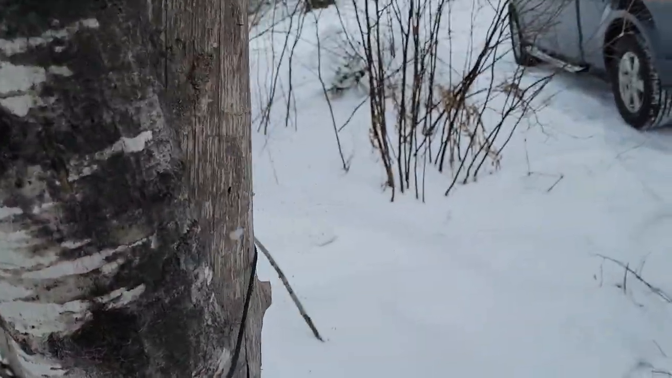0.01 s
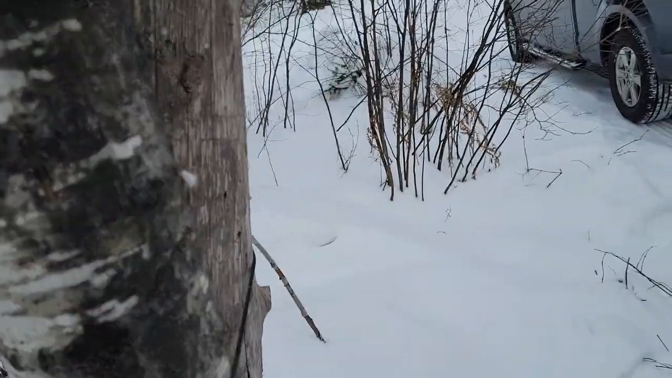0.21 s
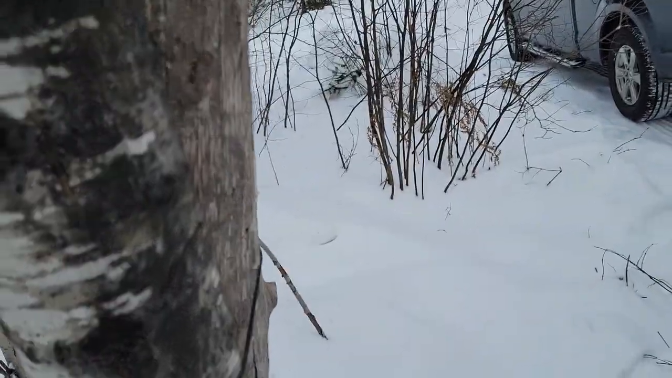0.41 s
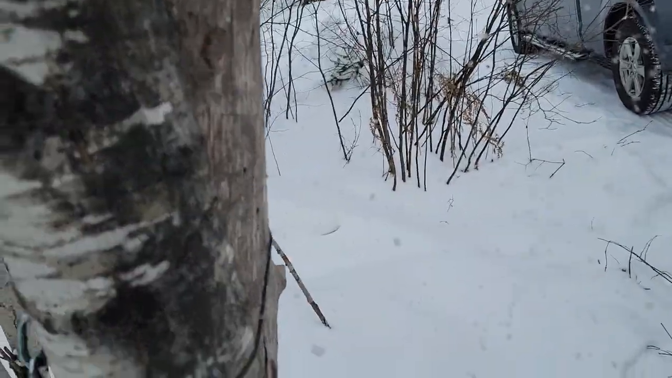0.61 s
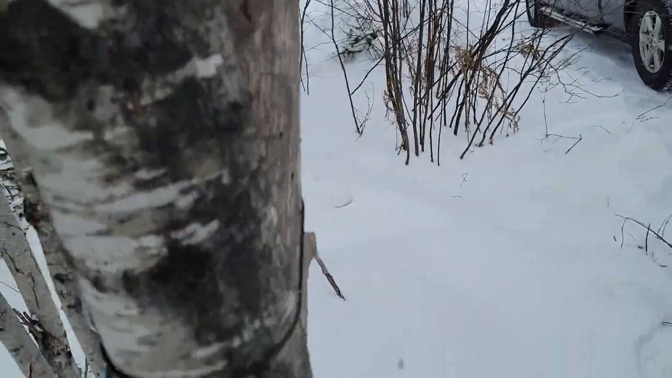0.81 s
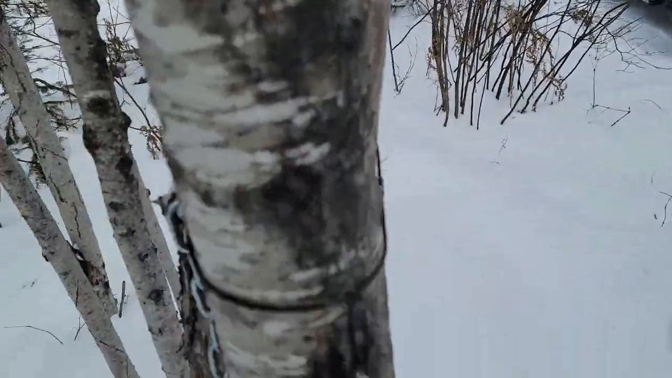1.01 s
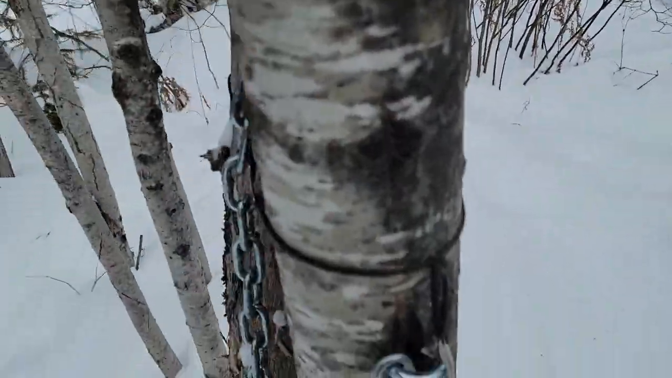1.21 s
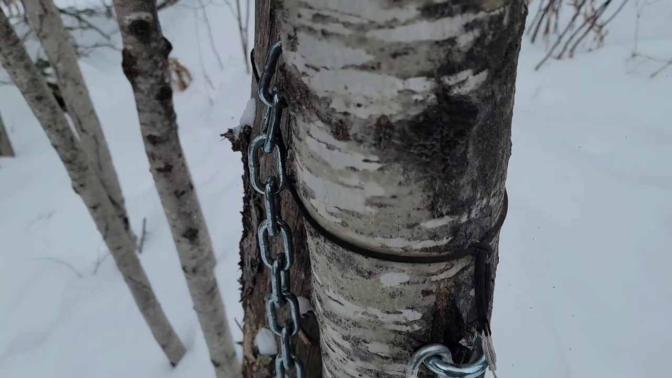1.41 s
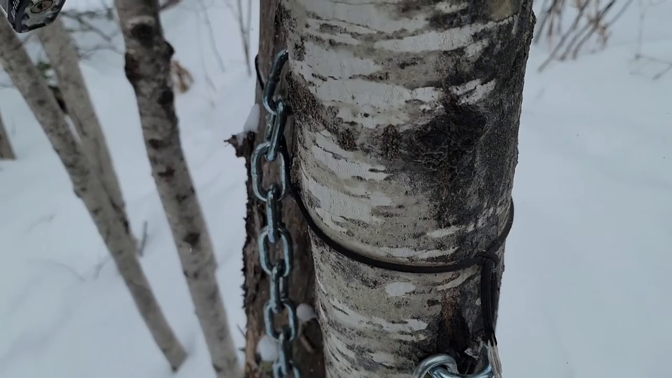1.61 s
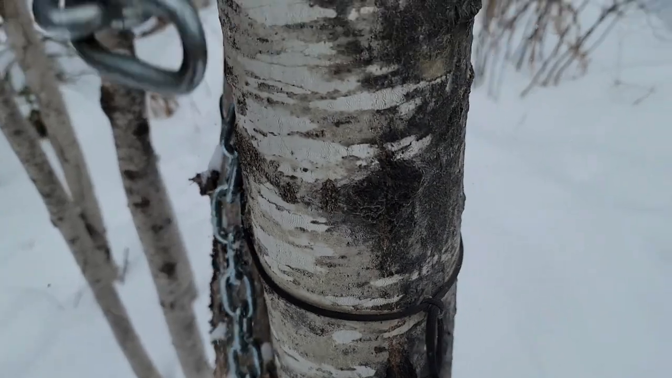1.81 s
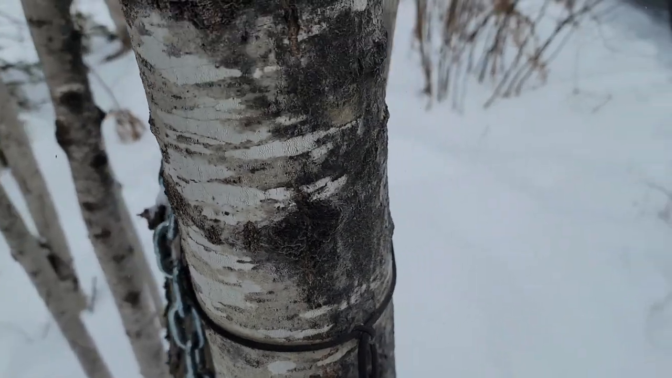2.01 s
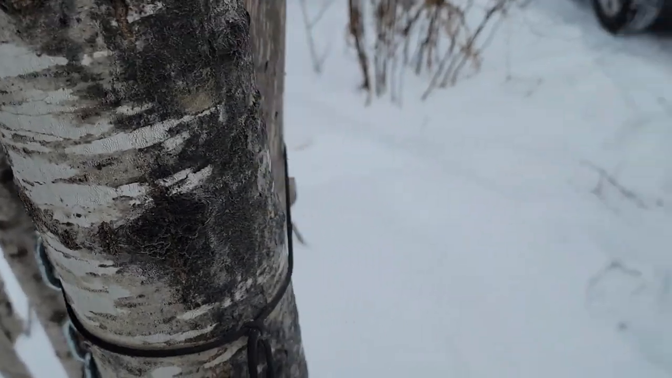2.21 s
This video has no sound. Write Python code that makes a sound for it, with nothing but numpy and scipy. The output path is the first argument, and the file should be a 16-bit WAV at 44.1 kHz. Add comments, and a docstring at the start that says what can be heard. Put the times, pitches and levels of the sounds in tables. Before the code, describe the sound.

Thin, very high chain jingling beside a tree outdoors, with crunching snow steps and light finger knocks

```python
"""Outdoors in winter beside a tree post: a steel chain is handled close to the microphone.
Its short links strike in flurries of uneven contacts, each exciting a very high ring and a tick of noise.
Boots press into crusted snow: filtered grains pack and crunch, short bursts crack or knock dully, narrow
noise squeaks and low, brief waves thud. Clothing rustles and air rumbles on the microphone as shaped
noise; a finger taps beside its left side as short knocks."""
import sys
import numpy as np
from scipy import signal
from scipy.fft import rfft, irfft, next_fast_len
from scipy.io import wavfile
from scipy.ndimage import uniform_filter1d, minimum_filter1d

SR = 44100
rng = np.random.default_rng(int(sys.argv[2]) if len(sys.argv) > 2 else 0)


def inscribe(sig):
    """Save sig as 16-bit PCM at rate SR to the path in sys.argv[1].

    A 1-D sig is mono; a 2-D sig holds one channel per row.
    Samples are clipped to [-1, 1] before scaling.
    """
    pcm = np.round(np.clip(np.atleast_2d(sig).T, -1, 1) * 32767)
    wavfile.write(sys.argv[1], SR, pcm.astype(np.int16))


N = 99225  # samples, 2.25 s


def undb(db):
    """Decibels to amplitude gain."""
    return 10 ** (np.asarray(db) / 20)


def unit(x):
    """Scale to rms 1 over all channels together."""
    return x / np.sqrt(np.mean(x ** 2) + 1e-20)


def sides(db):
    """Left and right gains for a left-minus-right level difference, at constant power."""
    half_difference_db = np.array([[db], [-db]]) / 2
    return unit(undb(half_difference_db))


def curve(points):
    """Join (time_s, level_db) points into a gain for every sample."""
    time_s, level_db = np.array(points).T
    return undb(np.interp(np.arange(N) / SR, time_s, level_db))


def colour(x, points):
    """Minimum-phase filter, built by folding the cepstrum, with the response of (frequency_hz, level_db)."""
    size = 2 * next_fast_len(x.shape[-1])
    hz, db = np.array(points).T
    bin_hz = np.arange(size // 2 + 1) * SR / size
    response_db = np.interp(np.log(bin_hz + 1), np.log(hz), db)
    cepstrum = irfft(np.log(undb(response_db)))
    # Folding the second half onto the first makes the filter causal
    cepstrum[1:size // 2] *= 2
    cepstrum[size // 2 + 1:] = 0
    filtered = irfft(rfft(x, size) * np.exp(rfft(cepstrum)))
    return filtered[..., :x.shape[-1]]


def fade(t, t60):
    """Exponential decay, 60 dB in t60 seconds."""
    return np.exp(-np.log(1000) * t / max(t60, 1e-4))


def add(out, x, start):
    """Mix a sound in at its start in seconds."""
    i = int(np.clip(start * SR, 0, N - 1))
    out[:, i:i + x.shape[-1]] += x[:, :N - i]


def pair(three, lag_ms, diffuse):
    """One shared signal that reaches the right side late, plus a separate one on each side."""
    late = np.roll(three[0], int(round(lag_ms * SR / 1000)))
    shared = unit(np.array([three[0], late]))
    separate = unit(three[1:])
    return np.sqrt(1 - diffuse) * shared + np.sqrt(diffuse) * separate


def noise(channels=3):
    """Unrelated white noises."""
    return rng.standard_normal((channels, N))


def rustle():
    """Clothing rubs close by: coloured noise, nearly all shared by both sides, follows a level curve."""
    # Level of the rustle: time_s, level_db
    rustle_level = [(0, -37.5), (.08, -39.5), (.25, -60), (.62, -33.5), (.78, -30.5), (1.03, -37.5),
                    (1.4, -30), (1.7, -40.5), (1.95, -47.5), (2.12, -58)]
    # Spectrum of the cloth: frequency_hz, level_db
    cloth_spectrum = [(80, -13), (160, -0.5), (330, 2), (650, -1.5), (1000, -5), (2000, -13.5),
                      (4000, -22.5), (7000, -27.5), (12000, -38.5)]
    return pair(colour(noise(), cloth_spectrum), lag_ms=0.28, diffuse=0.074) * curve(rustle_level)


def rumble():
    """Air moves on the microphone: low noise, partly separate on each side, follows a level curve."""
    # Level of the rumble: time_s, level_db
    rumble_level = [(0, -37.5), (.7, -42), (1.03, -50.5), (1.16, -37.5), (1.48, -39.5), (1.62, -50.5),
                    (2.25, -52)]
    # Spectrum of the air: frequency_hz, level_db
    air_spectrum = [(15, -13), (35, -2), (55, 6), (80, 5), (115, -2), (170, -15.5), (500, -59.5)]
    return pair(colour(noise(), air_spectrum), lag_ms=0, diffuse=0.45) * curve(rumble_level)


def chain():
    """In a flurry near-alike links each tick and ring on their own run of uneven contacts, which thins out."""
    # Link flurries: start_s, level_db, length_s, lead_pitch_hz, ring_t60_s, left_right_db
    flurries = [(0.025, -49.5, 0.24, 13300, 0.087, 3), (0.172, -27.5, 0.0041, 12750, 0.18, 8),
                (0.201, -12.5, 0.007, 13350, 0.17, 8), (0.291, -27, 0.1, 13700, 0.36, 6),
                (0.428, -22.5, 0.0038, 13950, 0.059, 9), (0.518, -38, .004, 12780, 0.085, 5),
                (0.572, -19.5, .012, 12780, 0.12, 4), (0.651, -22.5, 0.021, 13500, 0.15, 7),
                (0.682, -14, 0.0054, 13600, 0.19, 8), (0.702, -13.5, 0.02, 12730, 0.13, 6),
                (0.74, -15.5, 0.022, 13780, 0.088, 6), (0.819, -16, 0.045, 12800, 0.12, 5.5),
                (0.902, -31, 0.092, 13250, 0.27, 0), (1.019, -22, 0.013, 13300, 0.11, 13),
                (1.035, -9, 0.019, 12730, 0.3, 2.5), (1.063, -4.5, 0.0096, 13800, 0.082, -6),
                (1.103, -13.5, 0.028, 13560, 0.16, 5), (1.2, -41.5, 0.21, 12750, 0.15, 3),
                (1.4, -28, 0.02, 13900, 0.064, 8), (1.457, -25, 0.027, 12750, 0.12, 6),
                (1.492, -20, 0.013, 13800, 0.084, 5), (1.509, -11.5, 0.036, 12780, 0.25, 1),
                (1.583, -29, 0.0166, 13800, 0.092, 0), (1.632, -19.5, 0.022, 12750, 0.052, 1),
                (1.689, -21.5, 0.012, 13250, 0.066, 3), (1.713, -18, 0.0079, 12780, 0.11, 4),
                (1.764, -26.5, 0.018, 12750, 0.29, 3), (1.785, -16, 0.0017, 13780, 0.13, -3),
                (1.797, -16.5, 0.021, 13280, 0.096, 5), (1.845, -15, 0.023, 12730, 0.16, 6.5),
                (1.908, -13, 0.035, 13780, 0.2, 5), (1.937, -7.5, 0.022, 12700, 0.13, -4.5),
                (1.967, -12.5, .017, 13760, .1, 4), (2.206, -36, 0.11, 13750, 0.07, 8)]
    # Ringing of the neighbouring links: frequency_hz, level_db
    link_modes = [(12660, -3.5), (12740, -1), (12810, -11), (13110, -18), (13220, 4), (13300, -2),
                  (13450, -1.5), (13570, -13.5), (13760, 2), (14400, -11)]
    # Spectrum of the tick at each contact: frequency_hz, level_db
    tick_spectrum = [(2500, -28.5), (6800, -15.5), (9000, -20), (11500, -9.5), (13300, 6.5), (15300, -10.5),
                     (17000, -21.5)]
    links_touched, contacts_per_s = 3, 1300  # the initial contact rate is shared among the links
    first_contact = 1.6  # strength of the contact that opens a flurry
    contact_scatter_db, contact_s = 5, 0.00035  # a link's ring builds up over the time of contact
    mode_spread, lead_db = 0.005, 7.5  # spread of link pitches as a fraction; level of the leading mode
    tick_db, tick_t60_s = -16.5, 0.016  # tick level relative to the ring

    out, t = np.zeros((2, N)), np.arange(SR // 3) / SR
    mode_hz, mode_db = np.array(link_modes).T
    age = t[:SR // 4]
    build_up = 1 - np.exp(-(age / contact_s) ** 2)
    for start, db, length, lead_hz, t60, pan_db in flurries:
        sound = 0
        for link in range(links_touched):
            contact_rate = contacts_per_s / links_touched * np.exp(-(t / length) ** 2 / 2)
            touches = rng.random(len(t)) < contact_rate / SR
            scatter = undb(contact_scatter_db * rng.standard_normal(len(t)))
            hits = touches * rng.uniform(-1, 1, len(t)) * scatter
            hits = hits * np.exp(-(t / length / 2) ** 2)  # later contacts are weaker too
            hits[0] = first_contact * (link == 0)

            link_hz = mode_hz * (1 + mode_spread * rng.standard_normal(len(mode_hz)))
            hz = np.append(link_hz, lead_hz)
            phase = np.exp(2j * np.pi * rng.random((2, len(hz))))  # separate on each side
            gain = undb(np.append(mode_db, lead_db)) * phase
            modes = (gain @ np.exp(2j * np.pi * hz[:, None] * age)).imag
            ring = modes * fade(age, t60) * build_up
            tick = colour(rng.standard_normal(ring.shape) * fade(age, tick_t60_s), tick_spectrum)
            strike = unit(ring) + undb(tick_db) * unit(tick)
            sound = sound + signal.fftconvolve(strike, hits[None], axes=1)[:, :len(t)]
        # Longer flurries and rings carry more energy
        sounding = (length + t60 / np.log(1000)) / t[-1]
        add(out, unit(sound) * np.sqrt(abs(sounding) / 2) * undb(db) * sides(pan_db), start)
    return out


def snow():
    """Dense grains break while a boot sinks in; the finest die away first as it settles."""
    # Boots loading the snow: start_s, rise_s, hold_s, fade_db_per_s (before each layer's factor),
    # packing_db, crunch_db, crust_db, powder_db, left_right_db
    treads = [(0.095, 0.0043, 0.028, 296, -34, -41, -43.5, -49.5, 3.5),
              (0.108, 0.12, 0.028, 204.5, -20, -25.5, -26, -34.5, 2.5),
              (0.245, 0.052, 0.089, 159, -20.5, -16, -20, -33.5, 3),
              (0.331, 0.03, 0.029, 338.5, -45, -39, -15.5, -23.5, 1),
              (0.51, 0.0031, 0.071, 55.5, -38.5, -38, -39, -47.5, 1.5),
              (0.624, 0.057, 0.0045, 330, -39.5, -30.5, -27, -36, 0),
              (0.782, 0.018, 0.043, 269, -29.5, -21, -20, -31.5, 3),
              (0.856, 0.031, 0.015, 197, -31, -19.5, -25, -27.5, -0.5),
              (0.976, 0.029, 0.17, 146.5, -42, -29, -37, -44, 0),
              (1.085, 0.035, 0.022, 128, -26, -13.5, -30, -56, 0.5),
              (1.28, 0.017, 0.018, 224, -32.5, -22.5, -22.5, -32.5, -3),
              (1.337, 0.016, 0.062, 160, -35.5, -25.5, -35.5, -50, -3),
              (1.404, 0.0093, 0.07, 258, -39, -15, -16, -24, -3.5),
              (1.493, 0.025, 0.013, 95.5, -36.5, -18, -18, -29.5, -4.5),
              (1.705, 0.016, 0.017, 84, -42, -32, -65.5, -81, -15),
              (2.046, 0.0059, 0.0089, 218, -50.5, -54, -62.5, -85, -11)]
    # Spectrum of snow packing under the sole: frequency_hz, level_db
    packing = [(90, -26), (170, -7.5), (260, -3.5), (450, -2), (700, 1.5), (900, 2.5), (1300, -33.5),
               (3000, -58.5)]
    # Spectrum of grains crunching: frequency_hz, level_db
    crunch = [(400, -22.5), (750, -5), (1000, 7.5), (1450, 8.5), (1850, 3), (2250, 2), (2550, -3),
              (3100, -18), (6000, -46.5)]
    # Spectrum of the crust splitting: frequency_hz, level_db
    crust = [(1200, -28), (2200, 4), (2600, 3), (3000, 4), (3400, 0), (3800, -9), (4400, -8.5),
             (5000, -52.5), (9000, -25.5)]
    # Spectrum of fine powder: frequency_hz, level_db
    powder = [(2500, -7), (4200, 1), (5200, -1), (7000, -1), (8200, -11), (10500, -14.5), (12500, -2),
              (16000, -15)]
    # The same four layers in order: grains_per_s, fade_factor (ratio), left_right_offset_db,
    # right_lag_ms, diffuse_share (0 to 1)
    grain_layers = [(2500, 0.7, 1.5, 0.27, 0.063), (3950, 0.86, -5.5, 0.39, 0.4),
                    (3700, 1.55, -2, 0.28, 0.43), (7370, 1.67, 7, 0.23, 1)]
    grain_scatter_db, crumble_db, crumble_per_s = 2.5, 1.5, 93

    out, t = np.zeros((2, N)), np.arange(N) / SR
    # A slow, random unevenness in level shared by all layers
    span = max(int(SR / crumble_per_s), 1)
    smooth = uniform_filter1d(noise(channels=1)[0], span)
    crumble = undb(crumble_db * unit(uniform_filter1d(smooth, span // 2 + 1)))
    spectra = (packing, crunch, crust, powder)
    for k, (spectrum, layer) in enumerate(zip(spectra, grain_layers)):
        rate, fade_factor, offset_db, lag_ms, diffuse = layer
        sign = np.sign(noise())
        breaks = rng.random(sign.shape) < rate / SR
        strength = undb(grain_scatter_db * np.minimum(rng.exponential(size=sign.shape), 5))
        grains = sign * breaks * strength
        power = 0
        for start, rise, hold, fade_db_s, *layer_db, pan_db in treads:
            sink = np.clip((t - start) / max(rise, 1e-3), 0, 1) ** 1.98
            settling_s = np.maximum(t - start - rise - hold, 0)
            load = sink * undb(-abs(fade_db_s * fade_factor) * settling_s)
            power = power + (load * undb(layer_db[k]) * sides(pan_db + offset_db)) ** 2
        out += np.sqrt(power) * crumble * pair(colour(grains, spectrum), lag_ms, diffuse)
    return out


def cracks_and_knocks():
    """Cracks and dull knocks underfoot: a click and a short burst, filtered around one frequency."""
    # Single cracks and knocks: start_s, peak_db (before panning), centre_hz,
    # half_width_octaves (to -6 dB), t60_s (before the filter), left_right_db
    bursts = [(0.107, -25, 249, 0.25, 0.14, 4), (.221, -8.5, 2000, 1.2, .03, 3),
              (0.2957, -7, 2600, 2.7, 0.072, 2), (0.363, -7, 1200, 0.49, 0.012, 11),
              (0.548, -21, 3450, 0.2, 0.019, -4), (0.752, -15, 324, 1.2, 0.033, 2),
              (0.799, -8, 1270, 0.55, .007, 0), (0.8909, -4.5, 1450, .6, 0.017, 19),
              (1.166, -14, 476, 0.5, 0.011, 9), (1.296, -6, 2900, 0.15, 0.017, 7),
              (1.324, -13.5, 3060, .22, .06, 2), (1.417, -3, 400, 0.85, 0.025, 5.5),
              (1.424, -13, 2660, 0.5, 0.012, -1.5), (1.521, -12, 2500, .8, .06, 5)]
    out, t = np.zeros((2, N)), np.arange(SR // 20) / SR
    hz = np.geomspace(40, 18000, 30)
    for start, db, centre_hz, octaves, t60, pan_db in bursts:
        shape_db = -20 * np.log10(1 + (np.log2(hz / centre_hz) / octaves) ** 2)
        click = 10 * (t == 0)
        source = (rng.standard_normal(len(t)) + click) * fade(t, t60)
        burst = colour(source, np.c_[hz, shape_db])
        add(out, burst / np.abs(burst).max() * undb(db) * sides(pan_db), start)
    return out


def squeaks():
    """Snow shears under the sole: a narrow, rough resonance swells, drifts in pitch and dies away. The two
    short rows near 0.68 s are instead the brief ringing of a crack, made the same way."""
    # Squeaks, and near 0.68 s the two tones of a ringing crack: start_s, glide_length_s, start_hz, end_hz,
    # level_db
    shears = [(0.254, 0.2, 680.6, 757, -16), (0.327, 0.1, 3288, 3410, -18.5), (0.685, 0.03, 850, 836, -24),
              (0.681, 0.01, 3490, 3400, -30.5), (1.426, .24, 2219, 2456, -17), (1.68, .21, 2330, 1952, -33),
              (2.04, .13, 1930, 2120, -47)]
    width_hz, lag_ms = 293, 0.34
    swell_peak = 0.17  # when the swell peaks, as a fraction of the glide
    out = np.zeros((2, N))
    lowpass = signal.butter(2, width_hz / 2, fs=SR, output="sos")
    for start, length, from_hz, to_hz, db in shears:
        age = np.maximum(np.arange(N) / SR - start, 0) / length
        pitch_hz = np.interp(age, [0, 1], [from_hz, to_hz])
        # Slow complex noise is moved up to the gliding pitch
        turn = np.exp(2j * np.pi * np.cumsum(pitch_hz) / SR)
        tone = (signal.sosfilt(lowpass, noise() + 1j * noise()) * turn).real
        swell = age / swell_peak * np.exp(1 - age / swell_peak)
        ending = np.clip(2 * (1 - age) + 1, 0, 1) ** 2  # silent by one and a half glide lengths
        out += undb(db) * np.sqrt(swell * ending) * pair(tone, lag_ms, diffuse=0.27)
    return out


def thuds():
    """A boot takes the weight: a few low cycles, dull and centred, swell and die away."""
    # Weight shifting: start_s, envelope_peak_db, pitch_hz
    weight_shifts = [(1.149, -33, 124), (1.296, -29, 107)]
    peak_s = 0.011  # from the start to the top of the envelope
    out, t = np.zeros((2, N)), np.arange(SR // 5) / SR
    envelope = t / peak_s * np.exp(1 - t / peak_s)
    for start, db, hz in weight_shifts:
        wave = np.sin(2 * np.pi * (hz * t + rng.random())) * envelope
        add(out, undb(db) * wave * sides(0), start)
    return out


def taps():
    """A finger knocks lightly beside the left microphone and bounces, each time with the same sound."""
    # Finger taps: start_s, left_peak_db
    knocks = [(1.9504, -3.5), (1.9542, -5), (1.9593, -0.5)]
    # Spectrum of the knock: frequency_hz, level_db
    knock_spectrum = [(60, -9), (200, 1), (400, 4.5), (800, -7), (1020, 2.5), (1400, -6.5), (3500, -15.5),
                      (7500, -6.5), (15000, -37)]
    t60_s, right_db = 0.0093, -30  # decay before the filter; right side relative to the left
    out, t = np.zeros((2, N)), np.arange(SR // 20) / SR
    click = 10 * (t == 0)
    knock = colour((rng.standard_normal(len(t)) + click) * fade(t, t60_s), knock_spectrum)
    for start, db in knocks:
        add(out, knock / np.abs(knock).max() * undb(db) * undb([[0], [right_db]]), start)
    return out


def scene():
    """Chain, boots and handling together."""
    return rustle() + rumble() + chain() + snow() + cracks_and_knocks() + squeaks() + thuds() + taps()


def record(dry):
    """The recorder ducks the highest peaks for a few milliseconds and cuts the top."""
    ceiling_db, top_hz = -0.3, 15900
    peak = np.abs(dry).max(axis=0)
    room = np.minimum(1, undb(ceiling_db) / (peak + 1e-9))
    # Hold the lowest gain around each peak, then smooth it
    gain = uniform_filter1d(minimum_filter1d(room, size=128), size=128)
    lowpass = signal.ellip(8, 0.2, 70, top_hz, fs=SR, output="sos")
    return signal.sosfilt(lowpass, dry * gain)


dry = scene()
out = record(dry)
inscribe(out)
```